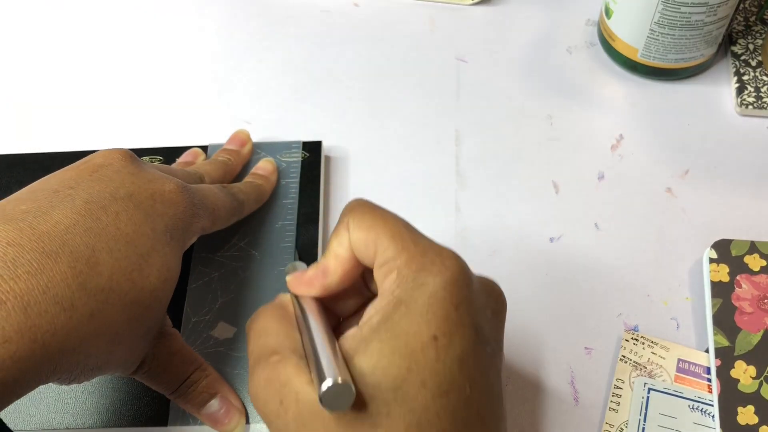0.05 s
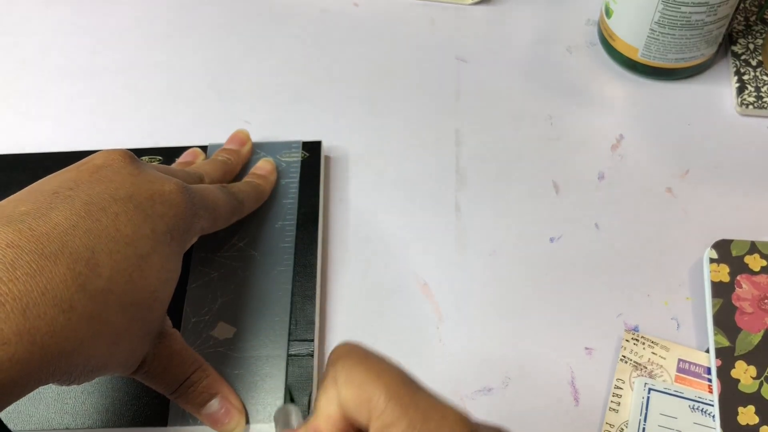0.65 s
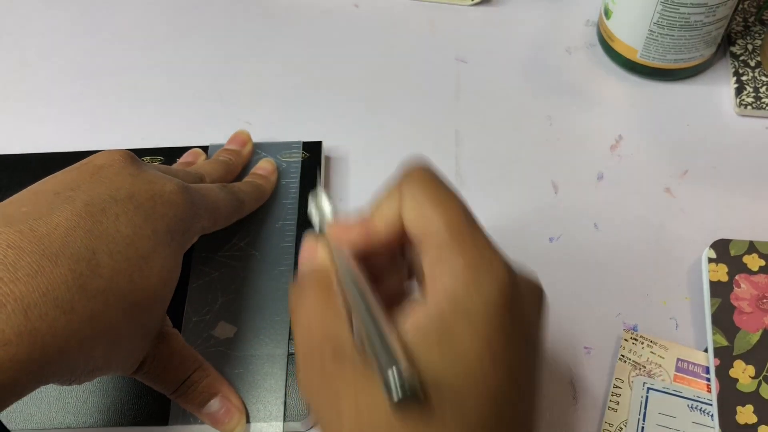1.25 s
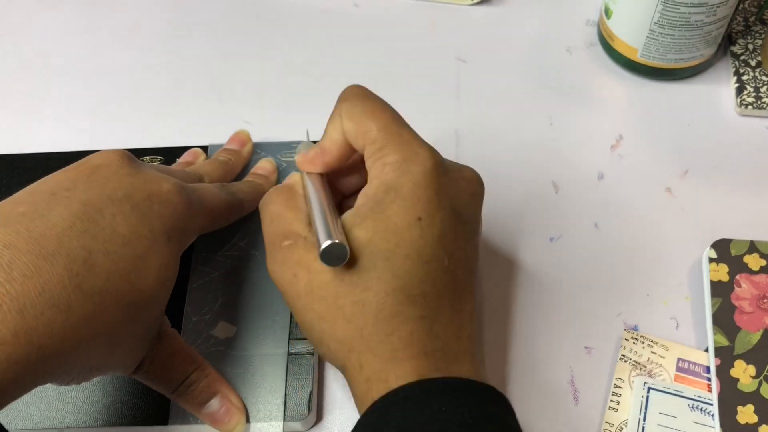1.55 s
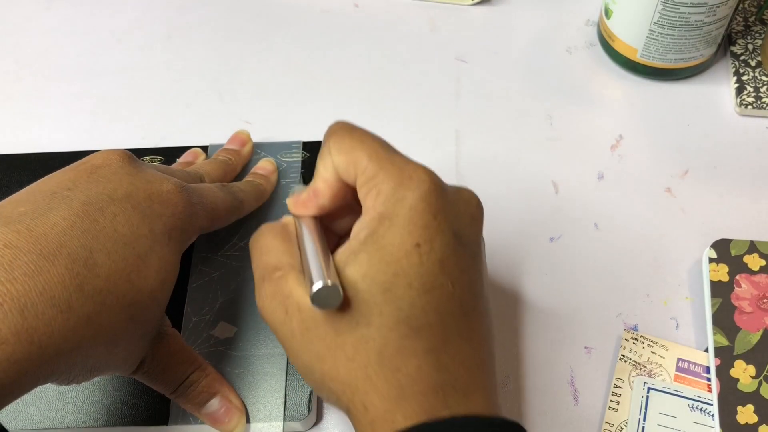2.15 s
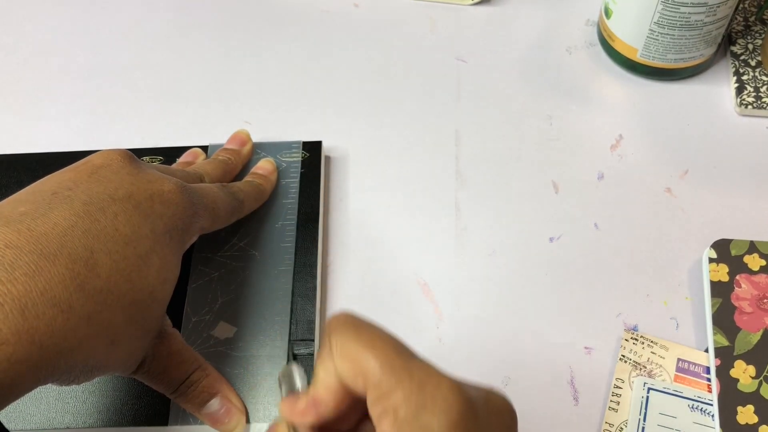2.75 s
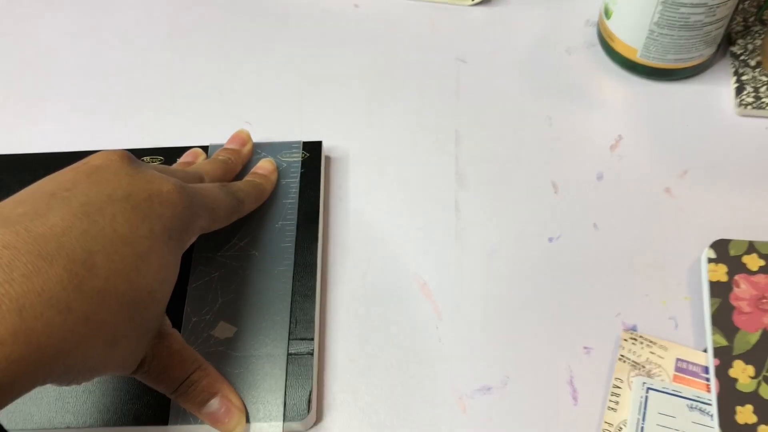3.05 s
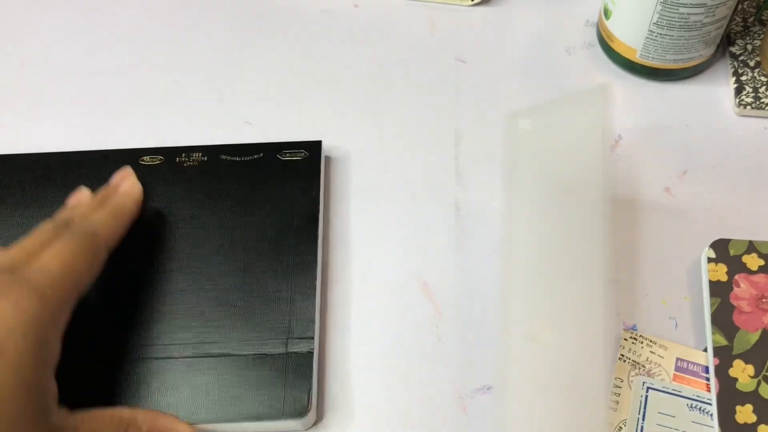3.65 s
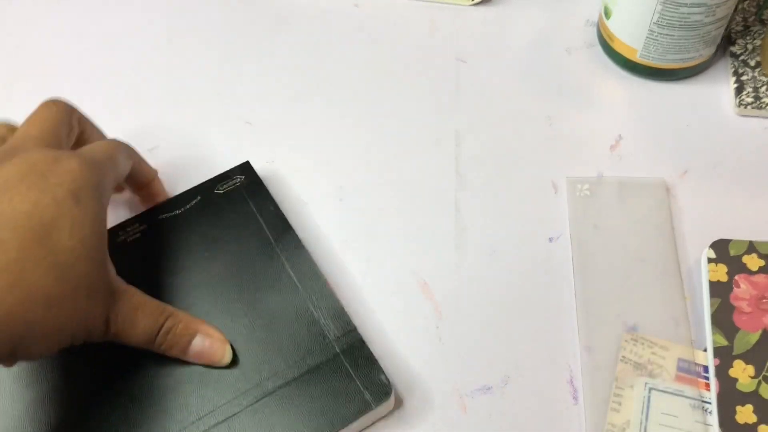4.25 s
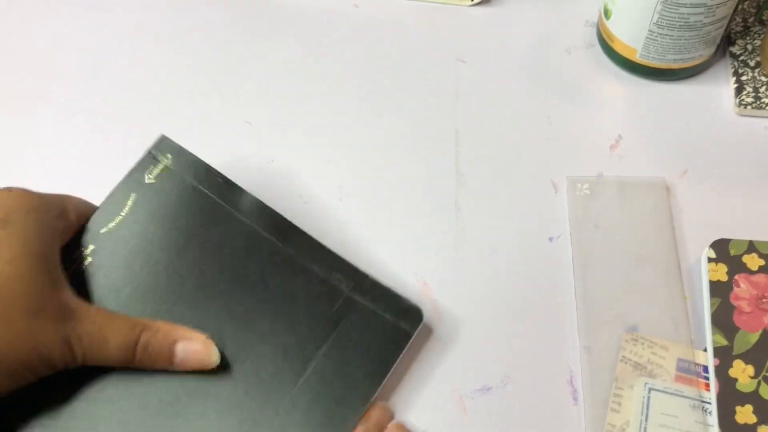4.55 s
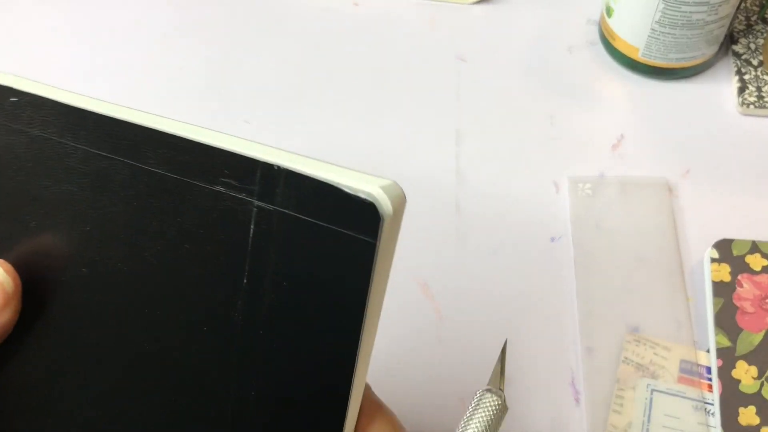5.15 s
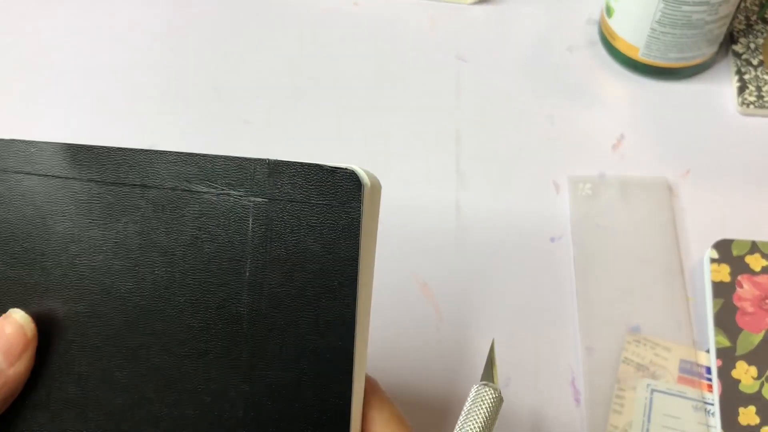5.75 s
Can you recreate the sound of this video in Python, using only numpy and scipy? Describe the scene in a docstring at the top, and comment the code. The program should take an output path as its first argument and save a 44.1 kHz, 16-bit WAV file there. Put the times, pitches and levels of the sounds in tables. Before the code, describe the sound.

Close over a desk in a small quiet room, a craft knife makes two scratchy strokes through a notebook cover, with soft hand taps between them. Each stroke finishes with a faint whistle and a ringing click of the blade. A plastic ruler then skims away and drops with a light clatter. The notebook rubs and thumps on the desk, and its cover crackles and rustles as it is picked up.

```python
"""A craft knife rasps twice through a notebook cover along a plastic ruler, tearing fibres as it goes.
Each stroke ends in a thin whistle and a click as the blade snaps off the edge onto the desk.
The ruler slides off and clatters aside; the notebook is dragged round and lifted in a few pushes,
its cover squeaking and crackling. All rubbing is stick and slip, coloured by the thing rubbed.
One small microphone, close over the desk in a small quiet room."""
import sys
import numpy as np
from scipy import signal
from scipy.fft import rfft, irfft
from scipy.io import wavfile
from scipy.ndimage import uniform_filter1d

SR = 44100
rng = np.random.default_rng(int(sys.argv[2]) if len(sys.argv) > 2 else 0)


def waveform_to_disk(signal):
    """Save audio, clipped to [-1, 1], as 16-bit WAV at the path in sys.argv[1]."""
    frames = np.transpose(np.atleast_2d(signal))
    scaled = np.clip(frames, -1, 1) * 32767
    samples = np.round(scaled).astype(np.int16)
    wavfile.write(sys.argv[1], SR, samples)


N = 260091
T = np.arange(N) / SR
HZ = np.fft.rfftfreq(N, 1 / SR)
AGE = T[:SR // 3]  # time since a short event began, s

# modes of the desk top: f/Hz, level/dB, t60/s
DESK_MODES = [(155, -2, 0.039), (229, 8.5, 0.023), (289.7, -13, 0.16), (313, 3.5, 0.02), (376, 7.5, 0.018),
              (487, -2.5, 0.039), (582, 2.5, 0.016), (863, 7.5, 0.016), (987, -11, 0.071),
              (1289, -3.5, 0.034), (1870, -6, 0.024)]


def amp(db):
    """Decibels to gain."""
    return 10 ** (np.asarray(db) / 20)


def unit(x):
    """Scales to rms 1."""
    return x / np.sqrt(np.mean(x ** 2) + 1e-20)


def read(points, hz):
    """Reads a table of (f/Hz, value) on a log-frequency axis."""
    f, value = np.transpose(points)
    return np.interp(np.log(hz + 1), np.log(f + 1), value)


def add(mix, s, sound):
    """Mixes a sound in at time s."""
    part = mix[max(round(s * SR), 0):][:len(sound)]
    part += sound[:len(part)]


def lowpass(x, hz):
    """Second-order low-pass."""
    return signal.sosfilt(signal.butter(2, min(hz, SR / 2 - 1), fs=SR, output="sos"), x)


def hump(x, hz, spread):
    """A broad band round hz, from hz / spread to hz * spread."""
    edges = [hz / spread, min(hz * spread, .45 * SR)]
    return signal.sosfilt(signal.butter(1, edges, "bandpass", fs=SR, output="sos"), x)


def waver(hz):
    """Random drift of rms 1, at rates up to about hz."""
    return unit(irfft(rfft(rng.standard_normal(N)) / (1 + (HZ / hz) ** 4), N))


def ring(modes, detune):
    """Dying modes after one blow, peak 1; each place of contact detunes them a little."""
    shifts = 1 + detune * rng.uniform(-1, 1, len(modes))
    x = sum(amp(db - 60 * AGE / t60) * np.sin(2 * np.pi * hz * shift * AGE)
            for (hz, db, t60), shift in zip(modes, shifts))
    return x / abs(x).max()


def slips(per_s, spread_db, grip_db, grip_hz, smooth):
    """Stick and slip: tiny releases of uneven size, clumped as the grip varies, over smooth rubbing."""
    sizes = amp(spread_db * np.minimum(rng.exponential(1, N), 4))
    releases = sizes * rng.choice([-1, 1], N) * (rng.random(N) < per_s / SR)
    rubbing = unit(releases) + smooth * rng.standard_normal(N)
    return unit(rubbing * amp(grip_db * waver(grip_hz)))


def ripple(x, depth_db, lift_db=0):
    """Near reflections off hand and desk cut peaks and notches that drift as the contact travels."""
    hz, _, spectrum = signal.stft(x, SR, nperseg=1024, noverlap=768)
    field = rng.standard_normal(spectrum.shape)
    for _ in range(2):
        field = uniform_filter1d(uniform_filter1d(field, size=5, axis=0), size=30, axis=1)
    reach = (hz / (hz + 1200))[:, None]  # long waves escape the ripple
    gain = amp(depth_db * reach * unit(field) + lift_db)
    return signal.istft(spectrum * gain, SR, nperseg=1024, noverlap=768)[1][:N]


def friction(drive, colour, gains, low_hz, high_hz):
    """Slips heard through a body; its low, middle and high parts each follow one of three gains."""
    low = 1 / (1 + (HZ / low_hz) ** 6)
    high = 1 / (1 + (high_hz / (HZ + 1)) ** 6)
    spectrum = rfft(drive) * amp(read(colour, HZ))
    bands = [low, 1 - low - high, high]
    return sum(unit(irfft(spectrum * band, N)) * gain for band, gain in zip(bands, gains))


def cut_gains(stroke, drum_db):
    """Gains of the cover's drumming, rasp and fizz: all follow the force, the fizz also the bite."""
    s, force_db, bite_db = np.transpose(stroke)
    usual_force_db = -63.5
    body_db = drum_db + 0.68 * (force_db - usual_force_db)  # drumming grows more slowly than rasp
    contact = np.clip(np.minimum(T - s[0], s[-1] - T) / .04 + 1, 0, 1)
    return [contact * amp(np.interp(T, s, db)) for db in (body_db, force_db, force_db + bite_db)]


def knife_stroke(stroke, drum_db, whistle):
    """The blade tears fibres; its resonances sink and wander, and a whistle sets in near the edge."""
    # resonances of cover and blade: f/Hz, half width/Hz, lift/dB, lift scaled by edge_share/dB
    resonances = [(820, 75, 5, 1.5), (1080, 70, 2, 2), (1720, 80, 5, -1.5), (2350, 140, 3.5, -2),
                  (3030, 190, 6, 1.5), (3800, 250, 1, 0.5), (5250, 390, -0.5, -3.5), (6900, 400, 2, 0),
                  (9300, 380, 5, -2), (11600, 900, 0, 4), (13100, 900, 0, 3.5)]
    # spectrum of the cut: f/Hz, level/dB
    colour = [(60, -54), (160, -9), (290, -8), (520, -11.5), (660, -16.5), (1100, -13), (1450, -16.5),
              (1900, -15), (2600, -7.5), (3800, -3.5), (5200, -12), (6800, -23), (8200, -29.5),
              (12000, -32.5), (15500, -38.5)]
    edge_lead_s, edge_blend_s = 0.32, 0.071  # the loose edge comes near this long before the end
    wobble_hz, wander, sink_per_s = 7, .016, .02  # pace of the hand; shares of a resonance's pitch
    tears = slips(per_s=4000, spread_db=2.4, grip_db=1.3, grip_hz=60, smooth=0.55)
    hz, t, _ = signal.stft(tears, SR, nperseg=1024, noverlap=768)
    start, end = stroke[0][0], stroke[-1][0]
    to_go = np.clip(end - t, 0, end - start)
    at_edge = (1 + np.tanh((edge_lead_s - to_go) / (2 * edge_blend_s))) / 2
    edge_share = .45 + 1.05 * at_edge

    final_hz, sink_hz_per_s, lead_s, whistle_db = whistle
    rise_s, width_hz, wander_hz = .16, 230, 55
    whistling = np.clip((lead_s - to_go) / rise_s, 0, 1)
    pitch = final_hz + sink_hz_per_s * to_go + wander_hz * np.interp(t, T, waver(2 * wobble_hz))
    lift_db = whistle_db * whistling * np.exp(-((hz[:, None] - pitch) / width_hz) ** 2)

    for f, width, db, edge_db in resonances:
        tilt, grip = (np.interp(t, T, waver(wobble_hz)) for _ in range(2))
        centre = f * (1 + sink_per_s * (to_go - edge_lead_s) + wander * tilt)
        peak = np.exp(-((hz[:, None] - centre) / width) ** 2)
        lift_db += peak * (db + edge_db * edge_share) * (1 + .65 * np.tanh(grip))
    drive = ripple(tears, depth_db=2.7, lift_db=lift_db)
    return friction(drive, colour, cut_gains(stroke, drum_db), low_hz=1830, high_hz=6490)


def scoring():
    """Two strokes of the knife through the cover, each with its own course of force and bite."""
    # one curve a stroke: t/s, force as level of the rasp/dB, bite as fizz of fibres over the rasp/dB
    strokes = [
        [(0.0, -58, -8), (0.07, -65.5, -6.5), (0.19, -57.5, 0), (0.264, -61, 4.5), (0.53, -56.5, 1),
         (0.638, -63, -7), (0.764, -59, -4.5), (0.826, -63.5, -6), (0.88, -60, -10)],
        [(1.83, -99, 17), (1.95, -68, 8), (2.04, -74.5, 10), (2.17, -67, 9.5), (2.31, -69.5, 6),
         (2.53, -64, 3.5), (2.7, -60, 6), (2.83, -61.5, 5), (2.925, -60, 9)],
    ]
    # the cover drumming under the blade at the usual force, one a stroke: level/dB
    drum_db = [-59.5, -55]
    # the blade's whistle, one a stroke: final f/Hz, sinking/(Hz/s), onset before the end/s, lift/dB
    whistles = [(5860, 1200, .33, 12), (6030, 250, .3, 13.5)]
    return sum(map(knife_stroke, strokes, drum_db, whistles))


def room_tone():
    """The low murmur of air in the room, with a faint hiss."""
    # spectrum of the air: f/Hz, level/dB
    colour = [(15, -49), (25, -26), (55, -10.5), (70, -10.5), (82, -14), (108, -9.5), (161, -9), (190, -5),
              (285, -15), (416, -18), (503, -23.5), (887, -27), (1890, -35), (6000, -40), (16000, -46)]
    noise = irfft(rfft(rng.standard_normal(N)) * amp(read(colour, HZ)), N)
    return amp(-62 + .6 * waver(6)) * unit(noise)


def hand_drags():
    """The side of the knife hand judders over the notebook, each drag with its own dull resonance."""
    # drags: start t/s, end t/s, level/dB, resonance f/Hz
    drags = [(0.163, 0.398, -55.5, 407), (0.217, 0.606, -55.5, 194), (0.746, 0.87, -61.5, 185),
             (1.913, 2.743, -60, 293)]
    # spectrum of the hand on the cover: f/Hz, level/dB
    colour = [(60, -41), (150, -8), (250, -1.5), (340, -9.5), (540, -4), (690, -12.5), (830, -5.5),
              (950, -16), (1500, -17), (4000, -38)]
    fade_s, lift_db, relative_width = 0.032, 11.5, 0.14
    out = np.zeros(N)
    for start, end, db, hz in drags:
        judder = slips(per_s=260, spread_db=2.5, grip_db=1.8, grip_hz=35, smooth=0.6)
        colour_db = read(colour, HZ) + lift_db * np.exp(-((HZ / hz - 1) / relative_width) ** 2)
        contact = np.clip(np.minimum(T - start, end - T) / fade_s, 0, 1)
        out += contact * amp(db) * unit(irfft(rfft(judder) * amp(colour_db), N))
    return out


def dull_bumps():
    """Arm, fingers and knife bump desk and notebook, which swing for a few low cycles."""
    # bumps: t/s, level/dB, f/Hz
    bumps = [(0.521, -50.5, 55.3), (.689, -54, 55), (0.764, -55.5, 69.5), (.9035, -31.5, 440),
             (.907, -38.5, 148), (1.04, -56, 71), (1.384, -42.5, 124), (2.23, -58, 54.5), (2.359, -51, 55),
             (2.941, -38, 130), (2.9434, -31.5, 478), (3.24, -55, 60), (3.366, -39, 400), (3.519, -53, 70),
             (3.668, -52, 103.2), (3.772, -35, 470), (4.108, -41.5, 110), (4.447, -41.5, 97),
             (5.122, -46, 134), (5.257, -44, 148), (5.573, -43, 169), (5.589, -46.5, 150)]
    swell_cycles = 0.67
    out = np.zeros(N)
    for s, db, hz in bumps:
        age = AGE * hz / swell_cycles
        swell = (age * np.exp(1 - age)) ** 2
        add(out, s, amp(db) * swell * np.sin(2 * np.pi * hz * AGE))
    return out


def thud(modes, hardness_hz, rattle, swell_s):
    """Desk and notebook take a moment to answer a blow; a softer blow reaches only their low modes."""
    pages = hump(rng.standard_normal(len(AGE)), 1100, 2.4) * np.exp(-AGE / .004)
    body = ring(modes, detune=0.051) * (1 - np.exp(-AGE / swell_s))
    blow = lowpass(body / abs(body).max() + rattle * pages, hardness_hz)
    bass_cut = signal.butter(2, 115 + 0.19 * hardness_hz, "highpass", fs=SR, output="sos")
    blow = signal.sosfilt(bass_cut, blow)
    return blow / abs(blow).max()


def clicks(hits, modes, spread, thud_hz, gain_db):
    """Each hard contact cracks, rings the thing that struck, and sets the desk thudding just after."""
    crack_s = .0004
    envelope = AGE / crack_s * np.exp(-AGE / crack_s) + .05 * np.exp(-AGE / .003)
    out = np.zeros(N)
    for s, db, hz, thud_db, ring_db in hits:
        crack = hump(rng.standard_normal(len(AGE)) * envelope, hz, spread)
        ringing = ring(modes, detune=0.00087) * (1 - np.exp(-AGE / 0.00007))
        add(out, s, amp(db) * 6.2 * crack / np.linalg.norm(crack))
        add(out, s + 0.00041, amp(ring_db) * ringing)
        add(out, s + 0.001, amp(thud_db) * thud(DESK_MODES, thud_hz, rattle=0.93, swell_s=0.0029))
    return amp(gain_db) * out


def knife_clicks():
    """The blade snaps off the cover onto the desk and rings; it also ticks once in the second cut."""
    # contacts, levels before gain_db: t/s, crack/dB, crack f/Hz, desk thud/dB, knife ring/dB
    hits = [(.8990, -54, 4750, -52, -31.5), (.9226, -52, 5030, -50, -51),
            (2.0705, -56.5, 2540, -46.5, -52.5), (2.9389, -44, 5100, -48, -32.5),
            (2.9550, -37, 3500, -41.5, -45), (2.9635, -48, 3130, -44.5, -51),
            (3.0005, -51.5, 3800, -49, -66), (3.0095, -59, 3470, -59, -62)]
    # modes of the knife: f/Hz, level/dB, t60/s
    modes = [(2265, 19, 0.02), (2640, 14, 0.008), (2985, 20, .011), (3220, 9, .009), (2255, -20, 0.33),
             (2990, -26, 0.1), (4124, -28, .2), (5500, -5, .008), (6400, -8, 0.012), (9250, 1, 0.013),
             (9420, -30, .25), (12600, 4, .004)]
    return clicks(hits, modes, spread=1.21, thud_hz=820, gain_db=14.0)


def settling_taps():
    """The knife hand taps the pressed notebook as it settles for the second stroke."""
    # taps: t/s, peak level/dB, hardness as cut-off f/Hz
    taps = [(1.303, -35.5, 720), (1.375, -35, 880), (1.4455, -38, 620), (1.722, -44.5, 330)]
    # modes of the pressed notebook: f/Hz, level/dB, t60/s
    modes = [(112, -8, 0.17), (226, 0, 0.046), (276, -3, 0.07), (354, -5, 0.053), (508, -10, 0.04),
             (635, -14, 0.04), (786, -8, 0.035), (1000, 2, 0.013)]
    out = np.zeros(N)
    for s, db, hardness_hz in taps:
        add(out, s, amp(db) * thud(modes, hardness_hz, rattle=1.0, swell_s=0.003))
    return out


def brief_scuffs():
    """Ruler and fingers scuff: short rubs, some chattering with nearly regular slips."""
    # scuffs: t/s, level/dB, rise/s, decay/s, centre f/Hz, band spread/factor, chatter/ratio to rub
    scuffs = [(3, -44, 0.01, .004, 2280, 2.9, 0), (3.223, -45.5, 0.0035, 0.0074, 2120, 3.7, 0.8),
              (3.285, -52.5, 0.035, 0.025, 4500, 2, 0.12),
              (3.422, -37.5, 0.0034, 0.0085, 2170, 1.53, 0.023),
              (3.919, -36.5, 0.015, 0.0056, 2330, 4.3, 0.95), (4.428, -38, 0.0016, 0.057, 794, 1.73, 0.054),
              (4.819, -57.5, 0.0036, 0.02, 4760, 1.5, 0)]
    chatter_hz = 486.5
    out = np.zeros(N)
    for s, db, rise, decay, hz, spread, chatter in scuffs:
        swell = np.minimum(AGE / rise, 1) * np.exp(-np.maximum(AGE - rise, 0) / decay)
        cycles = np.cumsum(chatter_hz * (1 + .2 * rng.standard_normal(len(AGE)))) / SR
        pulses = unit(np.diff(np.floor(cycles), prepend=0))
        drive = rng.standard_normal(len(AGE)) + chatter * pulses
        rub = lowpass(hump(drive, hz, spread), hz * 2.06)
        add(out, s, amp(db) * swell * unit(rub))
    return out


def ruler_clicks():
    """The plastic ruler clatters on the desk as it is moved off and dropped."""
    # contacts, levels before gain_db: t/s, crack/dB, crack f/Hz, desk thud/dB, ruler ring/dB
    hits = [(3.1212, -42.5, 7750, -40, -38), (3.355, -29, 4300, -47, -29),
            (3.3748, -27.5, 4300, -34, -17.5), (3.7337, -41, 5260, -59, -27),
            (3.7679, -30.5, 3100, -34, -15.5), (3.7755, -31.5, 3900, -38, -39),
            (3.8436, -43, 5140, -36.5, -26.5), (3.8515, -29, 4480, -54, -43),
            (3.8584, -26, 13600, -48, -22), (3.9082, -40.5, 6500, -58, -54)]
    # modes of the ruler: f/Hz, level/dB, t60/s
    modes = [(470, -40, .03), (1416, 23.5, 0.012), (1720, 12.5, 0.033), (2580, 19.5, 0.0095),
             (2910, 22, 0.015), (3357, 24, 0.0086), (3740, 9, 0.012), (6700, 12.5, 0.011), (14200, 1, .007)]
    return clicks(hits, modes, spread=1.7, thud_hz=890, gain_db=-4.0)


def push_gains(pushes, rumble_db, hiss_db, rumble_follows):
    """Gains of rumble, rub and hiss: each push swells and slows; a bright one trades rumble for hiss."""
    power = np.zeros((3, N))
    for s, db, rise, fall, bright_db in pushes:
        speed = np.exp(-np.maximum((s - T) / rise, (T - s) / fall) ** 2.02)  # a round bell
        rumble = amp(rumble_db - bright_db) * speed ** rumble_follows
        hiss = amp(hiss_db + bright_db) * speed
        power += (amp(db) * np.array([rumble, speed, hiss])) ** 2
    return np.sqrt(power)


def ruler_slide():
    """The smooth ruler skims off the cover."""
    # pushes of the hand: top speed t/s, level/dB, rise/s, fall/s, brightness/dB
    pushes = [(3.245, -47.5, 0.024, 0.011, 0), (3.355, -53.5, 0.17, 0.17, 6),
              (3.57, -66, 0.15, 0.073, 15.5), (3.81, -63.5, 0.13, 0.077, 7.5)]
    # spectrum of the sliding ruler: f/Hz, level/dB
    colour = [(53, -40), (90, 2), (201, 3), (229, 1.5), (556, -2), (606, -14), (804, -3), (1540, -12),
              (1750, -12), (2950, -9.5), (3430, -7), (6300, -6.5), (16000, -14)]
    skim = slips(per_s=4000, spread_db=3.5, grip_db=2.1, grip_hz=70, smooth=0.94)
    gains = push_gains(pushes, rumble_db=3.0, hiss_db=-10.0, rumble_follows=1.0)
    return friction(ripple(skim, depth_db=1.6), colour, gains, low_hz=720, high_hz=3070)


def desk_knocks():
    """Fingers, ruler and notebook knock on the desk and stir its modes."""
    # knocks: t/s, peak level/dB, hardness as cut-off f/Hz
    knocks = [(3.225, -37, 1380), (3.247, -52, 3530), (3.986, -28.5, 447), (4.11, -31, 630),
              (4.16, -25.5, 454), (4.2664, -27.5, 790), (4.298, -36, 800), (4.313, -33.5, 503),
              (4.37, -30, 448), (4.428, -26, 1190), (4.4508, -34, 695), (4.673, -30.5, 2200),
              (4.95, -47.5, 1500)]
    out = np.zeros(N)
    for s, db, hardness_hz in knocks:
        add(out, s, amp(db) * thud(DESK_MODES, hardness_hz, rattle=0.9, swell_s=0.0012))
    return out


def notebook_turn():
    """The heavier notebook rubs on the desk as it is dragged round."""
    # pushes of the hand: top speed t/s, level/dB, rise/s, fall/s, brightness/dB
    pushes = [(3.98, -52, 0.066, 0.04, -3), (4.075, -43.5, 0.078, 0.078, 4),
              (4.175, -52.5, 0.13, 0.099, -3.5)]
    # spectrum of the notebook on the desk: f/Hz, level/dB
    colour = [(82, -15), (150, -8), (230, 4), (286, 1), (385, 3), (433, -6), (921, -7.5), (1080, -11),
              (1810, -8), (2340, -19), (2790, -12), (3090, -19), (5590, -20), (6060, -21.5), (15100, -31.5),
              (16000, -41)]
    drag = slips(per_s=3000, spread_db=1.6, grip_db=1.2, grip_hz=60, smooth=1.0)
    gains = push_gains(pushes, rumble_db=2.0, hiss_db=-6.0, rumble_follows=0.78)
    return friction(ripple(drag, depth_db=1.0), colour, gains, low_hz=696, high_hz=2870)


def finger_squeaks():
    """The gripped cover squeaks under a finger: a rough tone whose pitch sags."""
    # squeaks: t/s, level/dB, length/s
    squeaks = [(4.248, -48, 0.0077), (4.263, -45, 0.017)]
    modes = [(1530, 7.5), (1800, -11), (2290, 4)]  # starting f/Hz, level/dB
    out = np.zeros(N)
    for s, db, length in squeaks:
        age = np.arange(0, length, 1 / SR)
        sagging_time = age * (1 - 0.046 * age / length)
        tone = sum(amp(mode_db) * np.sin(2 * np.pi * hz * sagging_time) for hz, mode_db in modes)
        rough = 1 + .4 * unit(lowpass(rng.standard_normal(len(age)), 500))
        add(out, s, amp(db) * np.sin(np.pi * age / length) * unit(tone * rough))
    return out


def notebook_lift():
    """The notebook flexes and rustles as it is drawn up."""
    # pushes of the hand: top speed t/s, level/dB, rise/s, fall/s, brightness/dB
    pushes = [(4.39, -49.5, 0.071, 0.058, 0.5), (4.465, -51.5, 0.082, 0.1, 1),
              (4.70, -56.5, 0.12, 0.17, -2), (5.14, -65, 0.17, 0.13, -0.5),
              (5.23, -65.5, 0.073, 0.054, -14), (5.49, -56.5, 0.13, 0.07, -8)]
    # spectrum of the rustle: f/Hz, level/dB
    colour = [(47, -42), (80, -20), (107, -1.5), (136, -0.5), (340, -7.5), (480, -3.5), (640, -5.5),
              (820, 0.5), (1070, -0.5), (1340, -3.5), (2220, -10), (3790, -21.5), (14300, -37.5),
              (16000, -37)]
    flex = slips(per_s=900, spread_db=1.4, grip_db=1.4, grip_hz=60, smooth=1.7)
    gains = push_gains(pushes, rumble_db=0.0, hiss_db=-2.0, rumble_follows=0.74)
    return friction(ripple(flex, depth_db=1.6), colour, gains, low_hz=660, high_hz=3450)


def cover_crackles():
    """The cover gives in tiny snaps as it bends."""
    # snaps: t/s, peak level/dB, centre f/Hz
    crackles = [(4.495, -33, 1900), (4.520, -35, 3000), (4.5605, -34, 1200), (4.590, -42, 1100),
                (4.6745, -33, 4200), (4.693, -39, 900), (4.763, -34.5, 950), (4.872, -46, 900)]
    decay_s = .0014
    out = np.zeros(N)
    for s, db, hz in crackles:
        burst = rng.standard_normal(len(AGE)) * np.exp(-AGE / decay_s)
        snap = lowpass(hump(burst, hz, spread=1.6), hz * 2.4)
        add(out, s, amp(db) * snap / abs(snap).max())
    return out


def room(x):
    """Sparse reflections of a small room, the treble dying first."""
    # decay of the room: f/Hz, t60/s
    decay = [(150, 0.31), (1000, 0.36), (3000, 0.29), (14000, 0.11)]
    echoes_per_s, first_echo_s = 3000, .004
    echoes = rng.standard_normal(len(AGE)) * (rng.random(len(AGE)) < echoes_per_s / SR)
    hz, t, spectrum = signal.stft(echoes * (AGE > first_echo_s), SR, nperseg=256)
    fade = amp(-60 * t / read(decay, hz)[:, None])
    tail = signal.istft(spectrum * fade, SR, nperseg=256)[1]
    return signal.fftconvolve(x, tail / np.linalg.norm(tail))[:N]


def scene():
    """Everything happens on the desk, close under the microphone, with a little room behind it."""
    knife = knife_clicks()
    desk = ruler_clicks() + scoring() + hand_drags()
    desk += ruler_slide() + notebook_turn() + notebook_lift()
    desk += settling_taps() + desk_knocks() + brief_scuffs() + dull_bumps()
    desk += finger_squeaks() + cover_crackles()
    reflections = room(amp(-12.5) * desk + amp(-17) * knife)
    return (desk + knife + reflections + room_tone())[None]


def record(dry):
    """The small microphone loses the deepest bass; the recorder cuts the highest treble."""
    bass_hz, top_hz = 38, 15950
    thin = signal.sosfilt(signal.butter(3, bass_hz, "highpass", fs=SR, output="sos"), dry)
    band_limit = signal.firwin(301, top_hz, window=("kaiser", 8), fs=SR)
    return signal.oaconvolve(thin, band_limit[None], "same")


dry = scene()
out = record(dry)
waveform_to_disk(out)
```